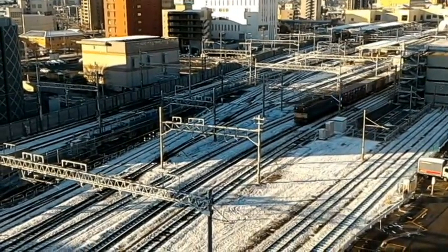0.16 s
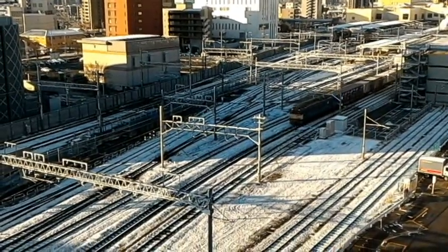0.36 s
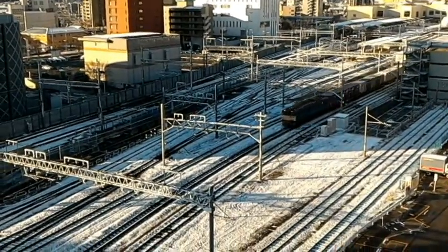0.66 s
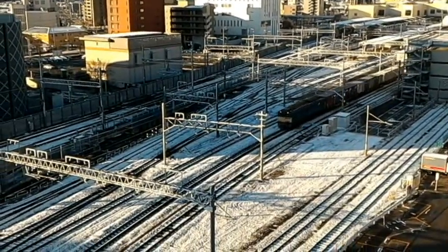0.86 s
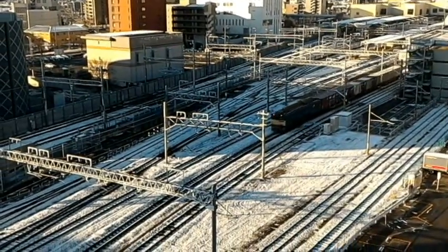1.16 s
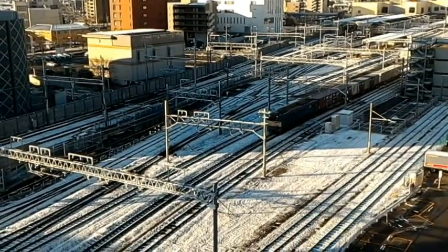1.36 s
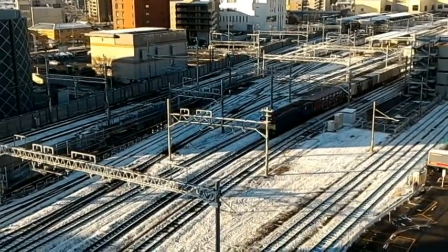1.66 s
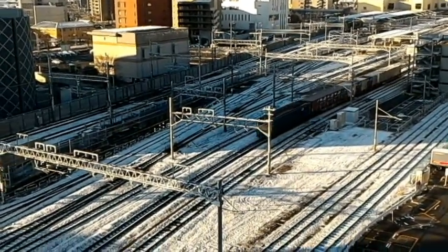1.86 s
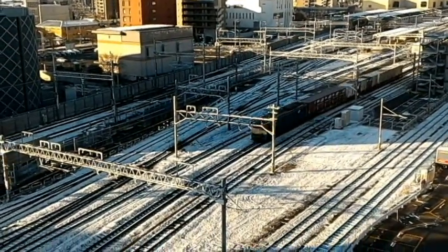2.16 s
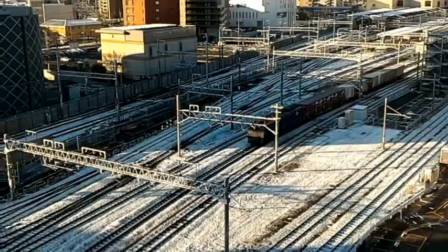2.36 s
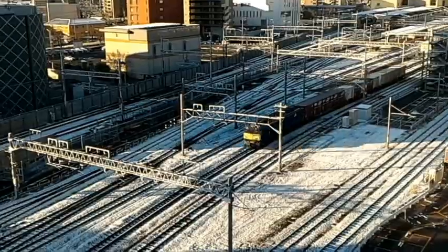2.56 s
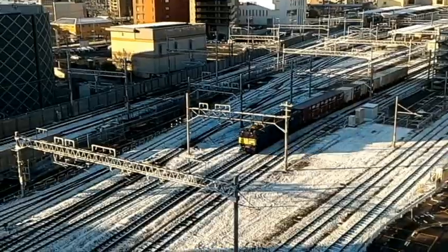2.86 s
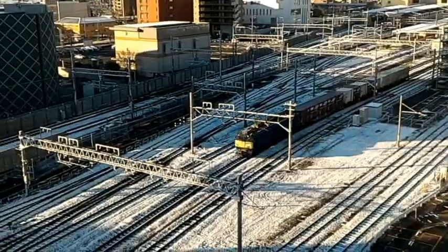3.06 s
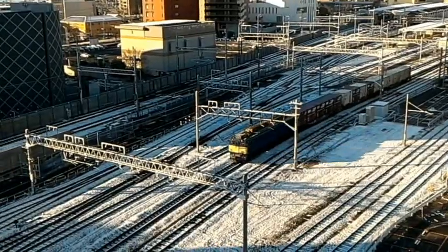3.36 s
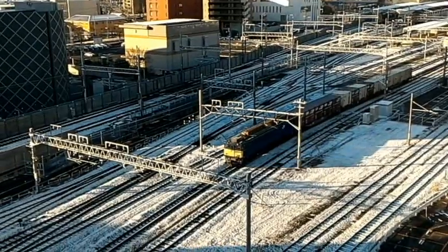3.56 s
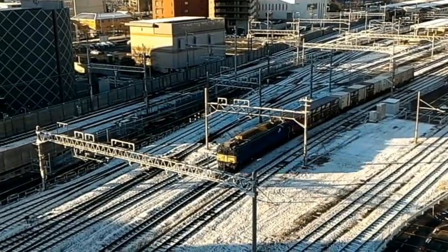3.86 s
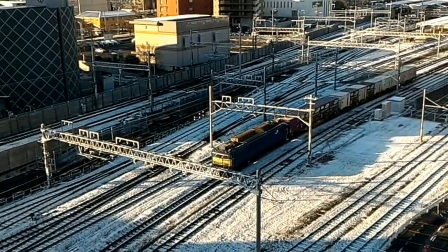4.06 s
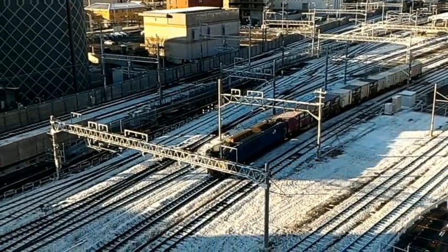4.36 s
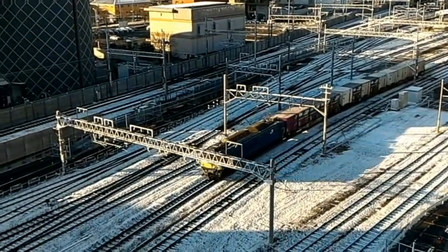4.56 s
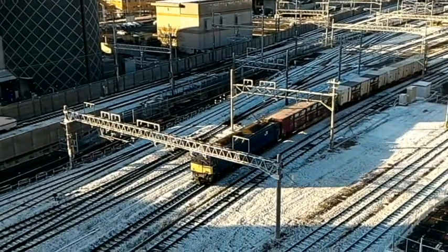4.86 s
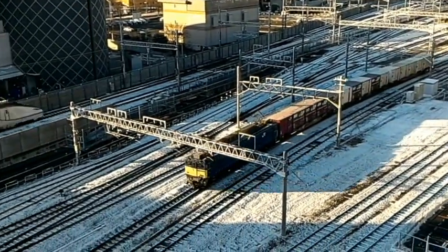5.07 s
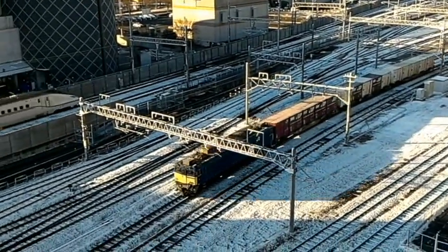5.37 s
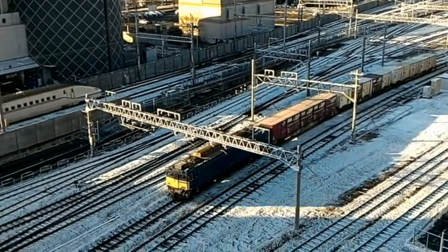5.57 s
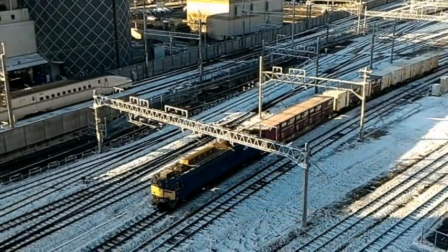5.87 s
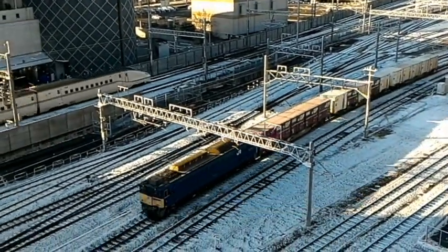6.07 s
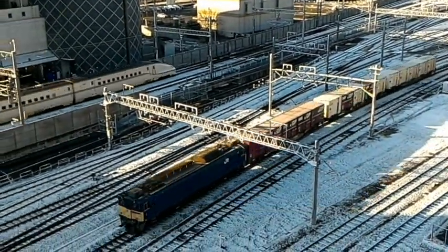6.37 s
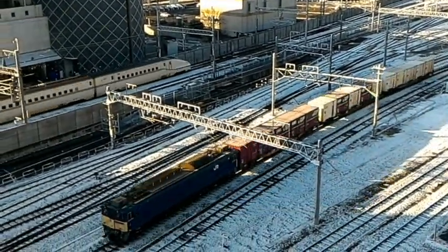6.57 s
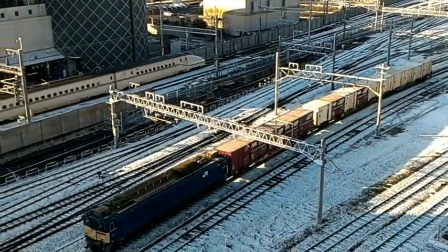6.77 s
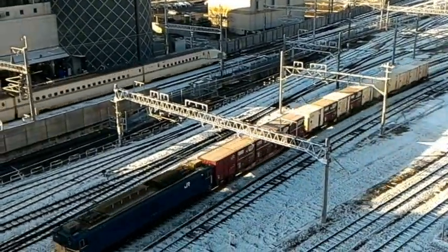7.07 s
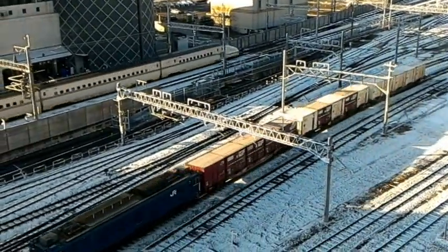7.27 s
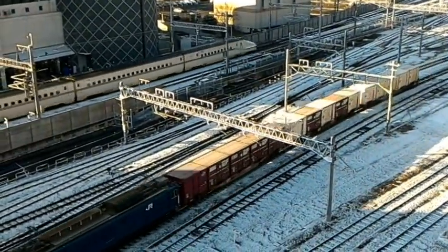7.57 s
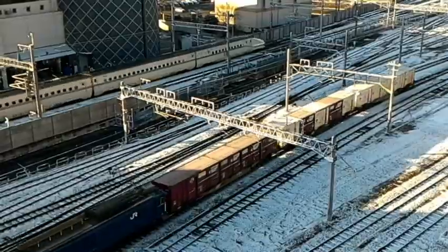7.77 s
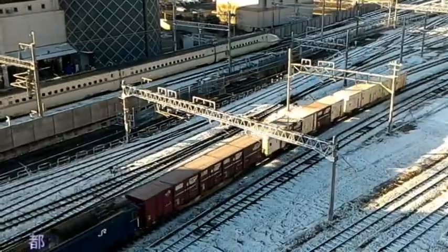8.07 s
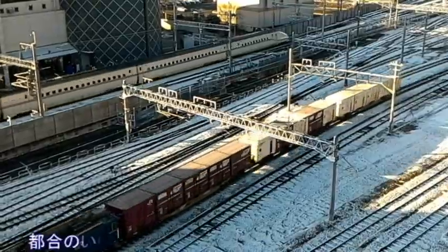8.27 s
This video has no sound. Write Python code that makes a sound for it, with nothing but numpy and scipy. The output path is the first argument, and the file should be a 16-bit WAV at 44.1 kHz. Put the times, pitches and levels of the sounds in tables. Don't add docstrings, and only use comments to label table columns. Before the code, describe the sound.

Heard from high behind a window, an electric freight train slowly approaches across a snowy rail yard. Faint rail hiss, a low blower drone and building rumble gradually grow, with wheels thudding over joints and shaking the pane. Near the end, flanges scrape and wagons clank and ring. Very close, the handheld microphone's plastic housing gives sharp, bright clicks, with brief skin rustles and soft bumps, far louder than the quiet train.

```python
import sys
import numpy as np
from scipy import signal
from scipy.fft import rfft, irfft
from scipy.io import wavfile
from scipy.ndimage import uniform_filter1d

SR = 44100
rng = np.random.default_rng(int(sys.argv[2]) if len(sys.argv) > 2 else 0)


def put_to_file(sound):
    columns = np.atleast_2d(sound).T
    safe = np.clip(columns, -1, 1)
    whole_steps = np.round(safe * 32767)
    wavfile.write(sys.argv[1], SR, whole_steps.astype(np.int16))


def invert_db(x):
    u = np.asarray(x, float) / 20
    return 10 ** u


N = 371763


def rms_one(x):
    return x / np.sqrt(np.mean(x ** 2) + 1e-20)


def in_time(curve):
    s, db = np.transpose(curve)
    return np.interp(np.arange(N) / SR, s, db)


def drift(rate_hz):
    r = np.exp(-80 * np.pi * rate_hz / SR)
    noise = rng.standard_normal(N // 40 + 2002)
    slow = signal.lfilter([1], [1, -2 * r, r * r], noise)[2000:]
    slow = rms_one(slow - slow.mean())
    return np.interp(np.arange(N) / 40, np.arange(len(slow)), slow)


def coloured(colour, modes=()):
    hz = np.maximum(np.fft.rfftfreq(N, 1 / SR), 1)
    at_hz, db = np.transpose(colour)
    gain = invert_db(np.interp(np.log(hz), np.log(at_hz), db, left=-90, right=-90))
    peaks = sum(invert_db(2 * d) / (1 + (2 * (hz - f) / width) ** 2) for f, width, d in modes)
    spectrum = rfft(rng.standard_normal(N)) * gain * np.sqrt(1 + peaks)
    return rms_one(irfft(spectrum, N))


def add(out, s, piece):
    i = round(s * SR)
    out[i:i + len(piece)] += piece[:N - i]


def damped(hz, t60, t):
    return np.sin(2 * np.pi * hz * t) * invert_db(-60 * t / t60)


# (time [s], level [dB])
APPROACH = [(0, -69.5), (1.1, -71.5), (1.7, -68.5), (2.4, -68), (2.8, -70), (3.4, -65.5), (4.1, -65.5),
            (5.1, -64.5), (6.1, -64.5), (6.7, -61.5), (6.9, -60.5), (7.3, -62), (7.55, -58), (7.75, -60.5),
            (7.96, -61), (8.15, -60), (8.3, -59.5), (8.43, -61)]


def with_approach(far_db, gain_per_db):
    return far_db + gain_per_db * (in_time(APPROACH) + 70)


# (frequency [Hz], level [dB per Hz])
HISS_COLOUR = [(2470, -36.5), (4200, -9), (4950, -8), (5480, -7), (5870, -8), (7970, -1), (11500, -11.5),
               (15100, -13.5), (15900, -9), (16300, -25.5)]


def hiss():
    return invert_db(-68) * coloured(HISS_COLOUR)


# (frequency [Hz], level [dB per Hz])
BOOM_COLOUR = [(8.2, -35), (14, -3.5), (38, -2), (81, -11), (113, -12.5), (130, -11.5), (170, -44.5),
               (290, -120)]
# (time of crest [s], level [dB], half length [s])
SWELLS = [(0.08, -40, 0.035), (0.227, -38, 0.068), (0.414, -51, 0.043), (0.572, -43.5, 0.043),
          (0.79, -43, 0.046), (1.303, -46.5, 0.17), (1.632, -40, 0.039), (1.792, -41, 0.051),
          (1.99, -47, 0.034), (2.12, -38.5, 0.031), (2.546, -43, 0.068), (2.806, -46, .06),
          (3.76, -35.5, .08), (4.04, -36, 0.085), (4.245, -35.5, 0.027), (4.338, -37, .05),
          (4.51, -34.5, 0.048), (4.835, -47, .04), (5.073, -33.5, .05), (5.216, -44.5, 0.088),
          (5.53, -35, 0.026), (5.67, -42, .04), (5.783, -31, 0.061), (5.95, -37.5, 0.084), (6.19, -47, .04),
          (6.428, -42, 0.067), (7.485, -25, 0.051), (7.64, -32.5, .04), (7.73, -34, 0.036),
          (8.398, -34, 0.035)]


def boom():
    low = coloured(BOOM_COLOUR, [(34, 6.99, 6.1)])
    even = low / np.sqrt(uniform_filter1d(low ** 2, size=SR // 10) + 0.53)
    t = np.arange(N) / SR
    power = invert_db(2 * with_approach(-47, 0.57))
    for crest, db, half in SWELLS:
        power += invert_db(2 * db) * np.exp(-2 * ((t - crest) / half) ** 2)
    return np.sqrt(power) * rms_one(even)


# (level when far [dB], gain per dB of approach [dB])
DRONE_LAWS = [(-58, .3), (-77, 1.8), (-67, .65)]
# (time [s], level [dB])
CARRY = [(0, -2), (.7, 1), (1.9, 6), (2.4, 4), (3.0, -4), (4.1, -1), (5.3, 2), (6.3, -2), (7.6, 1),
         (8.0, 5), (8.43, 5)]


def drone():
    start_hz, sag_hz, sag_power = 244.3, 4.4, 2.2
    hz = start_hz - sag_hz * (np.arange(N) / N) ** sag_power
    phase = 2 * np.pi * np.cumsum(hz * (1 + .001 * drift(4.0))) / SR
    levels_db = [with_approach(*law) + 2 + 1.5 * drift(3.0) for law in DRONE_LAWS]
    levels_db[0] += in_time(CARRY)
    return sum(invert_db(db) * np.sin(k * phase) for k, db in enumerate(levels_db, 1))


# (time [s], low thud level [dB], bright clank level [dB])
JOINTS = [(1.643, -45.5, -64), (3.055, -42.5, -65), (4.084, -50.5, -57), (4.429, -51, -77.5),
          (4.583, -33, -70), (4.695, -38, -62.5), (4.915, -33.5, -77), (5.18, -36, -69),
          (5.395, -33, -61.5), (5.666, -32, -57), (5.884, -28.5, -55), (5.95, -42.5, -68),
          (6.226, -38.5, -73.5), (6.284, -45, -60), (6.484, -59, -79), (6.94, -49, -50.5),
          (7.205, -37, -50), (7.41, -44, -53), (7.471, -46, -52), (7.688, -46, -49), (7.94, -34.5, -43.5),
          (8.103, -46, -46.5), (8.259, -40, -49.5), (8.376, -41, -64)]


def joint_blows(thud_share, gain_db, rise_s, fall_s):
    out, t = np.zeros(N), np.arange(SR // 2) / SR
    blow = np.clip(t / rise_s, 0, 1) * invert_db(-30 * np.maximum(t - rise_s, 0) / fall_s)
    for s, thud_db, clank_db in JOINTS:
        db = gain_db + thud_share * thud_db + (1 - thud_share) * clank_db
        add(out, s, invert_db(db) * blow)
    return out


# (frequency [Hz], level [dB per Hz])
ROLL_COLOUR = [(41, -32.5), (70, 4.5), (108, -3.5), (145, -9.5), (178, -2.5), (242, -0.5), (310, -11.5),
               (360, -30), (470, -51.5), (790, -120)]
# (frequency [Hz], width [Hz], level [dB])
PANE_LOW = [(62.8, 6, 7), (109, 11, 9.5), (183, 28, 8.5), (230.5, 10, 3.5), (293.8, 16, 11.5)]


def roll(shudder):
    level = invert_db(with_approach(-50.5, 0.65) + shudder)
    thuds = joint_blows(1, -2, rise_s=0.0053, fall_s=0.071)
    return coloured(ROLL_COLOUR, PANE_LOW) * (level + thuds)


# (frequency [Hz], level [dB per Hz])
ROAR_COLOUR = [(190, -34), (320, -7), (351, -3.5), (558, -5), (737, -4), (865, -11.5), (1040, -9.5),
               (1560, -13), (2400, -19), (3120, -46), (5280, -120)]
# (frequency [Hz], width [Hz], level [dB])
PANE_MID = [(448, 39, 1.5), (679, 14, 1.7), (754, 25, 7.4), (790, 68, 4), (955, 120, 3.3), (1153, 50, 3.2)]


def roar(shudder):
    level = invert_db(with_approach(-59, .55) + shudder + drift(25))
    knocks = joint_blows(0.67, -4.5 - 7, rise_s=.014, fall_s=0.088)
    return coloured(ROAR_COLOUR, PANE_MID) * (level + knocks)


def nearness():
    return np.clip((in_time(APPROACH) + 69.0) / 5.2, 0, 1)


# (frequency [Hz], level [dB per Hz])
FAR_COLOUR = [(1300, -12.5), (2000, -2), (2900, -0.5), (3600, -1), (4100, -7), (5200, -19), (6200, -28.5),
              (7500, -38)]
# (frequency [Hz], level [dB per Hz])
NEAR_COLOUR = [(1300, -9), (2000, -5), (2900, 1), (3600, 1), (4300, -3.5), (4800, -9), (6000, -30.5)]
# (frequency [Hz], width [Hz], level [dB])
WHEELS = [(1810, 35, 15), (2595, 58, 6.5), (3300, 90, 3), (3556, 140, 7), (3960, 34, 7.5), (4920, 60, 9.5),
          (5260, 60, 4.5), (5760, 26, 13.5)]


def steel(shudder):
    near = nearness()
    noise = np.sqrt(1 - near) * coloured(FAR_COLOUR) + np.sqrt(near) * coloured(NEAR_COLOUR, WHEELS)
    return noise * invert_db(in_time(APPROACH) + 2.5 + shudder + .8 * drift(2.1))


# (frequency [Hz], level [dB per Hz])
FLANGE_COLOUR = [(3800, -19.5), (4500, -2.5), (5000, -1.5), (5800, -5.5), (6200, -7), (7500, -30)]


def flanges():
    curve_s, curve_rise_s, curve_db = 6.65, 0.071, 9
    bite_db = curve_db * np.clip((np.arange(N) / SR - curve_s) / curve_rise_s, 0, 1)
    level = invert_db(with_approach(-78.5, 0.81) + bite_db - 1 + 2.2 * drift(9))
    return nearness() * coloured(FLANGE_COLOUR, WHEELS) * level


# (frequency [Hz], level [dB per Hz])
CLANK_COLOUR = [(1200, -11), (2000, -15), (2800, -2.5), (3500, -0.5), (4300, -3), (5200, -12), (6500, -25)]


def clanks():
    blows = joint_blows(0, -4, rise_s=0.016, fall_s=0.2)
    return nearness() * blows * coloured(CLANK_COLOUR, WHEELS[2:4])


def train():
    shudder = drift(5.1)
    return roll(shudder) + roar(shudder) + steel(shudder) + flanges() + clanks()


# (frequency [Hz], level [dB per Hz])
RUSTLE_COLOUR = [(1500, -28), (3000, -20.5), (4500, -15), (5500, 0.5), (6800, -9), (8300, -7),
                 (11000, -22.5), (15500, -41)]
# (time [s], rustle before [dB], rustle after [dB], length after [s], jolt level [dB])
GRIPS = [(0.174, -60, -52, 0.014, -67), (0.2154, -31, -31.5, 0.019, -46), (2.512, -77, -27.5, 0.02, -32.5),
         (3.7278, -40.5, -30, 0.015, -29.5), (3.9868, -50.5, -26, 0.012, -27.5),
         (4.214, -70, -44, .006, -60), (4.225, -67, -34.5, 0.015, -28.5), (4.312, -41, -34.5, 0.016, -28.5),
         (4.4935, -67, -32, 0.015, -31.5), (5.056, -70, -37, 0.0045, -28), (5.06, -60.5, -32, 0.012, -25),
         (5.7515, -31, -25.5, .014, -28.5), (6.6057, -70, -43, 0.0065, -40),
         (6.697, -72, -34.5, 0.0085, -35), (8.323, -70, -41, 0.0055, -59), (8.3303, -70, -45, 0.011, -55)]


def rustles():
    lead_s, lead_fall_s, rise_share = 0.0031, 0.0024, 0.42
    level, t = np.zeros(N), np.arange(SR // 20) / SR
    for s, before_db, after_db, length, _ in GRIPS:
        creep = s - lead_s, lead_s / 2, lead_fall_s, before_db
        drag = s, rise_share * length, (1 - rise_share) * length, after_db
        for start, rise, fall, db in (creep, drag):
            slope = np.minimum(t / rise, 1 + (rise - t) / fall)
            add(level, start, invert_db(db) * np.clip(slope, 0, 1) ** 1.8)
    catches_db = 4.0 * np.minimum(rng.exponential(1, N // 30 + 1), 3)
    grain = invert_db(catches_db).repeat(30)[:N]
    return level * rms_one(coloured(RUSTLE_COLOUR) * grain)


# (delay [s], level [dB], frequency [Hz], time to die by 60 dB [s])
JOLT_MODES = [(0.0017, 0.5, 338, 0.018), (0.0006, -2.5, 200, .012)]
# (time [s], level [dB], frequency [Hz], time to die by 60 dB [s])
BUMPS = [
    (0.183, -22.5, 60, 0.038),
    (0.2209, -22.5, 150, .0074),
    (2.522, -20, 170.4, .0068),
    (5.0603, -19, 128.7, 0.027),
    (5.0605, -12, 503, 0.0018),
    (5.7517, -26, 397, .0035),
    (5.757, -27, 118, 0.017),
]


def jolts():
    out, t = np.zeros(N), np.arange(SR // 10) / SR
    shifts = [(s + delay, db + mode_db, hz, t60)
              for s, *_, db in GRIPS for delay, mode_db, hz, t60 in JOLT_MODES]
    for s, db, hz, t60 in shifts + BUMPS:
        swing = damped(hz, 1.3 * t60, t)
        add(out, s, -invert_db(db) * swing / swing.max())
    return out


# (time [s], peak level [dB], brightness [dB], second slip [0-1],
# push on the diaphragm [dB])
TICKS = [(.1742, -9, 3, .2, -34), (.1752, -18, 0, .3, -34), (.1766, .4, 2, 1.0, -34),
         (.2143, -23, -6, .7, -28), (.2160, -27, -6, .3, -30), (2.5147, 0, 2, .3, -24),
         (3.7272, -25, 0, .3, -30), (3.7297, -.6, 3, .25, -20), (3.9876, .3, -5, .6, -20),
         (4.2260, -2, -4, .9, -18), (4.3143, -23, 0, .5, 3), (4.4965, -2.8, -1, .6, -22),
         (5.0550, -4.8, 4, .6, -21), (5.0602, -8.5, 8, .3, -36), (5.7515, -30, 12, .3, -15),
         (5.7548, -.5, -4, .8, -17), (6.6075, -41, 15, .3, -20), (6.6982, -30, 0, .3, -20),
         (6.7001, -18, -2, .4, -24), (6.7230, -41, 15, .3, -20), (8.3268, -27, -3, .8, -30),
         (8.3348, -30, -3, .4, -30)]
# (frequency [Hz], level [dB], time to die by 60 dB [s])
TICK_MODES = [(5460, -4, .006), (5730, -2, .0048), (4900, -17, .005), (3900, -24, .002), (6450, -6, .0018),
              (8300, -12, .003), (9300, -8.5, .0013), (11200, -20, .0015), (15400, -35, .003)]
# (frequency [Hz], level [dB], time to die by 60 dB [s])
CRACKS = [(2660, -17, 0.0024), (2010, -13.5, .0015)]


def tick_ring(bright_db, luck, t):
    pitch = 1 + .004 * min(bright_db, 6) + .004 * luck[-1]
    ring = np.zeros(len(t))
    for (hz, mode_db, t60), mode_luck in zip(TICK_MODES, luck):
        sign = -1 if hz > 8000 else 1
        db = mode_db + (hz > 6000) * bright_db + mode_luck
        ring += sign * invert_db(db) * damped(hz * pitch, t60, t)
    return ring


def ticks():
    out, t = np.zeros(N), np.arange(SR // 50) / SR
    lead = 16
    low_cut = signal.butter(1, 250, "high", fs=SR)
    push = damped(615, 0.001, t)
    chance = rng.standard_normal((len(TICKS), len(TICK_MODES) + 3))
    for (s, db, bright_db, second, push_db), luck in zip(TICKS, chance):
        slips = np.zeros(25)
        slips[[0, 6, lead, 24]] = .14 * invert_db(3 * luck[-2]), .18 * invert_db(3 * luck[-3]), 1, second + .15
        ring = np.convolve(slips, tick_ring(bright_db, luck, t))[:len(t)]
        piece = signal.lfilter(*low_cut, -ring)
        piece = piece / np.abs(piece).max() - invert_db(push_db - 3.5) * push / push.max()
        dull_db = 0.47 * abs(push_db + 17.5)
        for hz, crack_db, t60 in CRACKS:
            piece[lead:] += invert_db(crack_db - dull_db) * damped(hz, t60, t)[:-lead]
        add(out, s - lead / SR, invert_db(db + 2.4) * piece)
    return out


def scene():
    return (hiss() + boom() + drone() + train() + rustles() + jolts() + ticks())[None]


def top_cut(x):
    return signal.sosfilt(signal.butter(12, 16910, fs=SR, output="sos"), x)


def record(dry):
    overload_top = 1.15
    rounded = overload_top * np.tanh(.9 * dry / overload_top)
    treble_cut = signal.cheby2(8, 50, 16900, fs=SR, output="sos")
    mix = signal.sosfilt(treble_cut, rounded)
    return top_cut(mix)


dry = scene()
out = record(dry)
put_to_file(out)
```